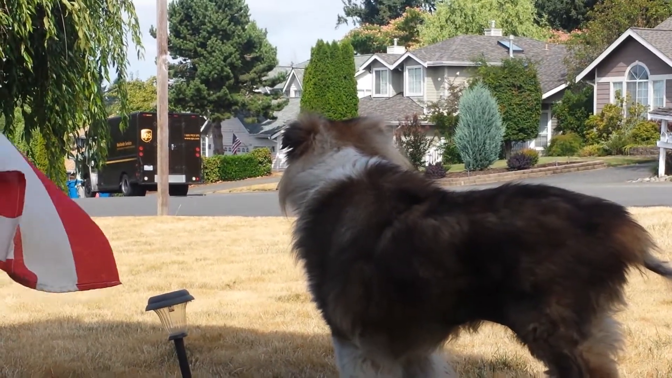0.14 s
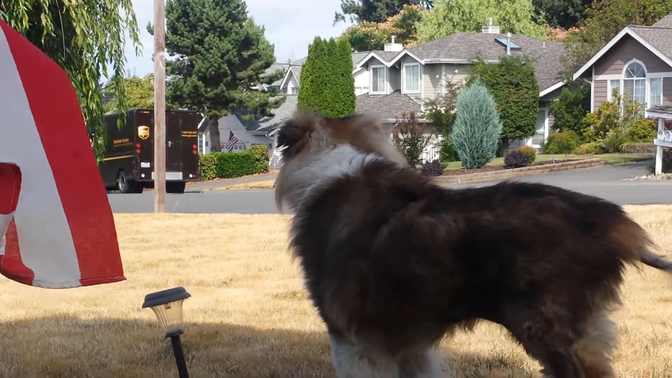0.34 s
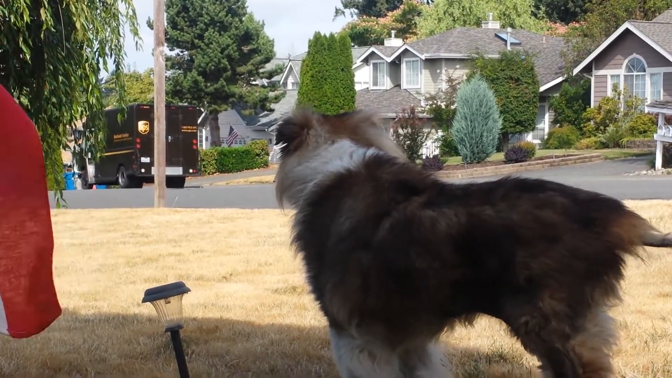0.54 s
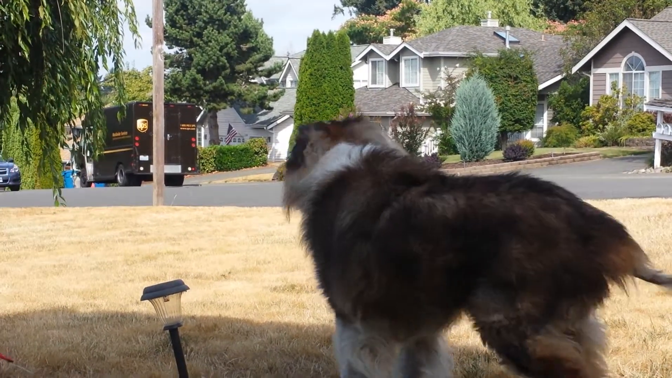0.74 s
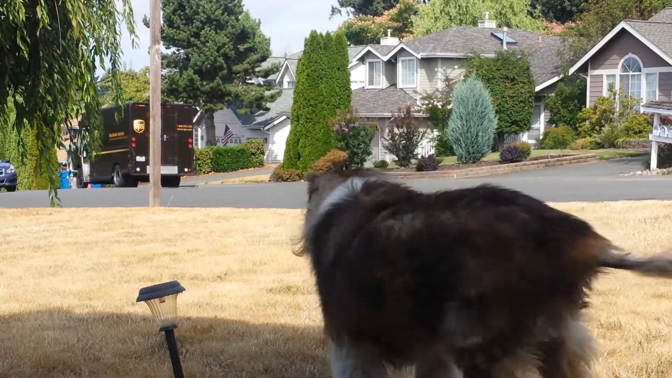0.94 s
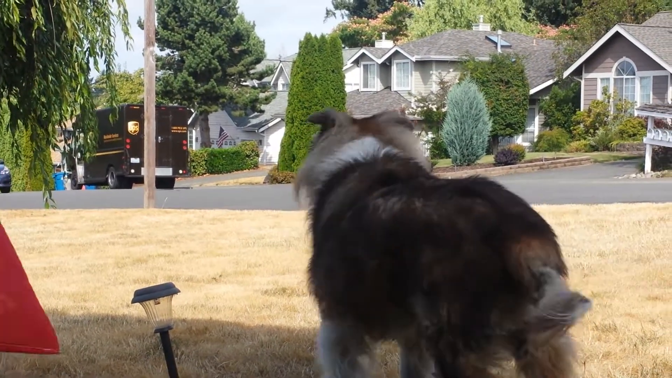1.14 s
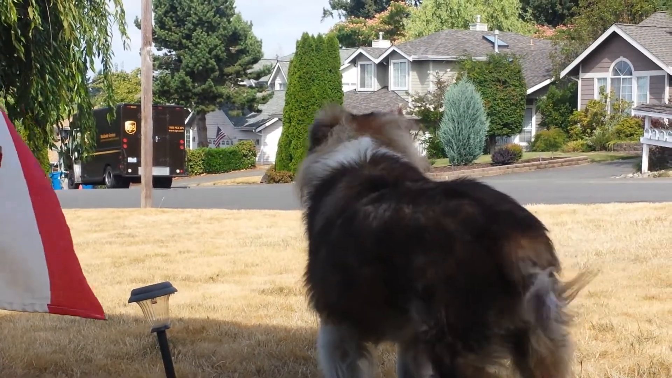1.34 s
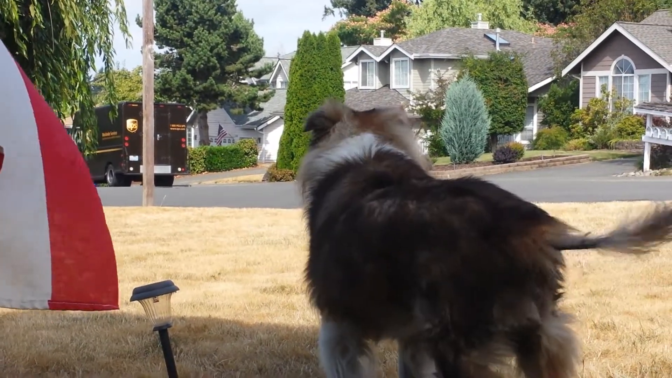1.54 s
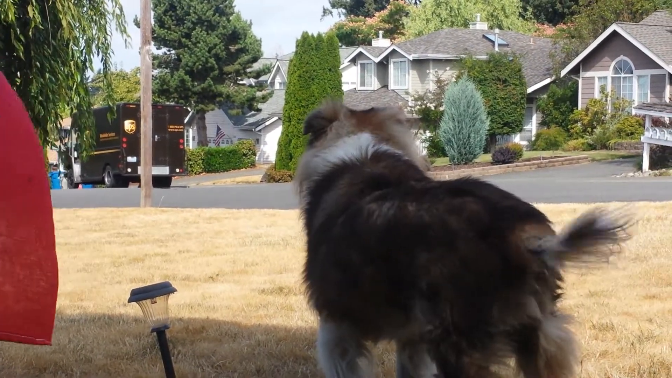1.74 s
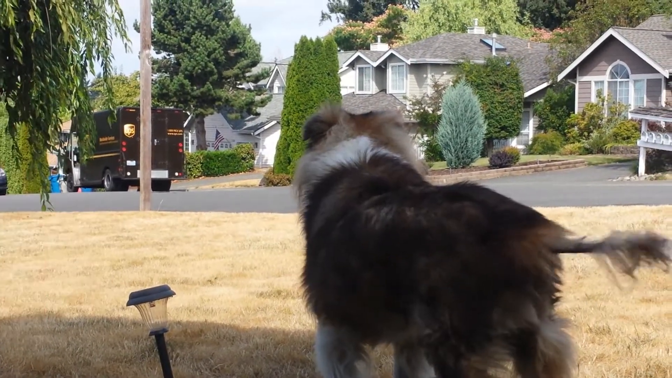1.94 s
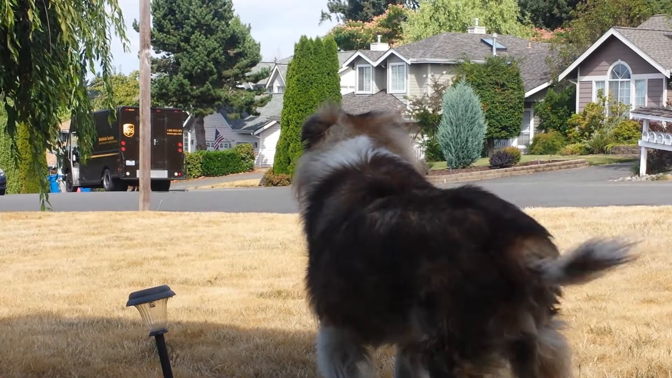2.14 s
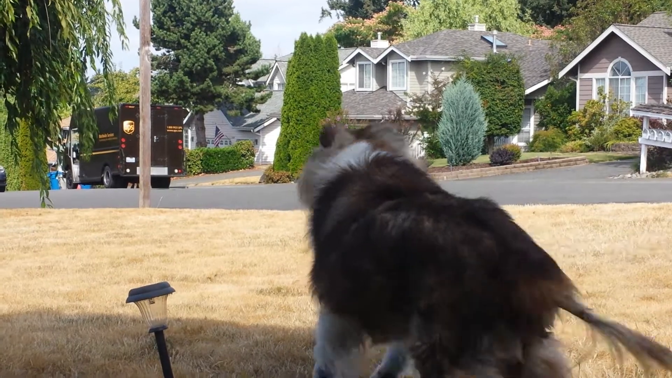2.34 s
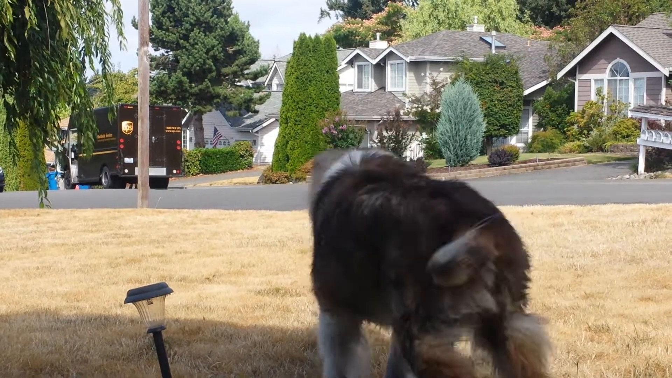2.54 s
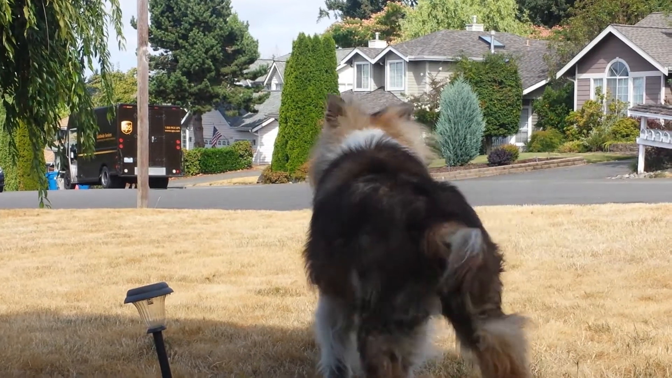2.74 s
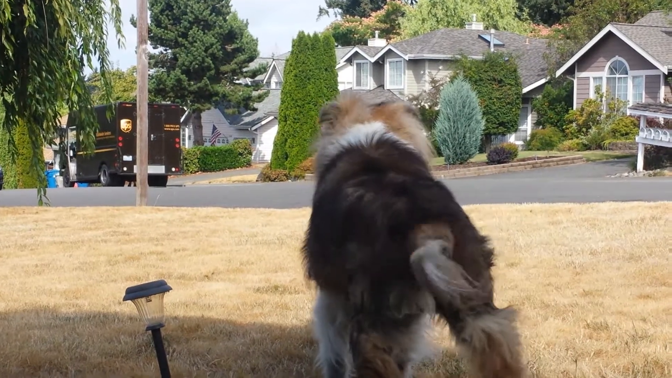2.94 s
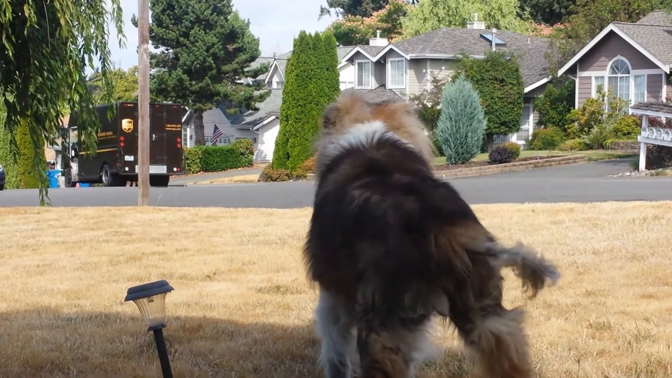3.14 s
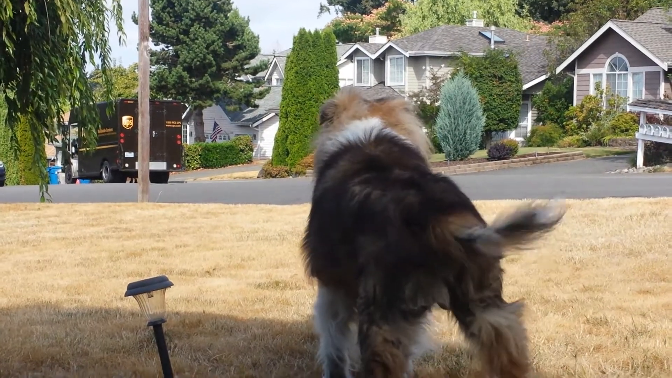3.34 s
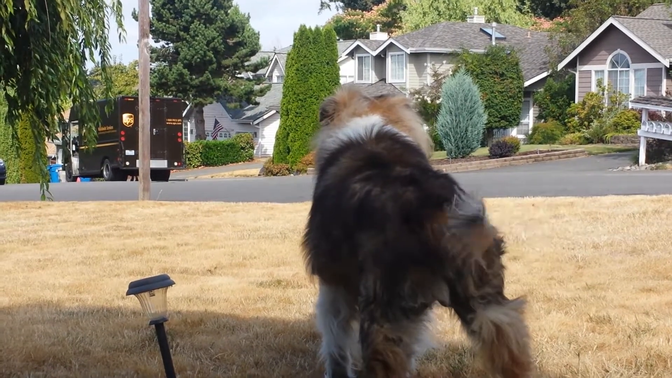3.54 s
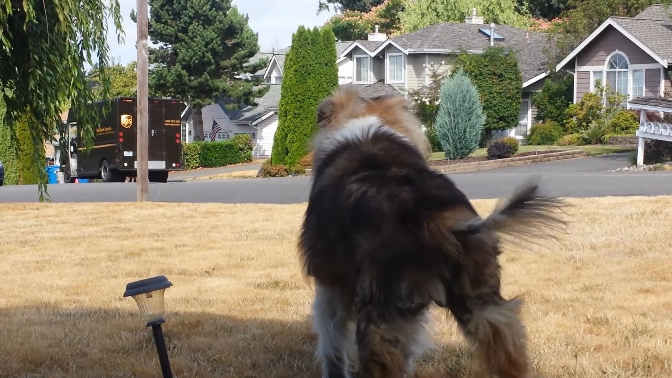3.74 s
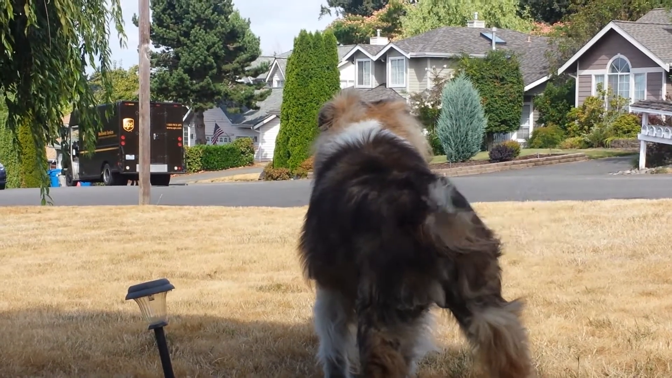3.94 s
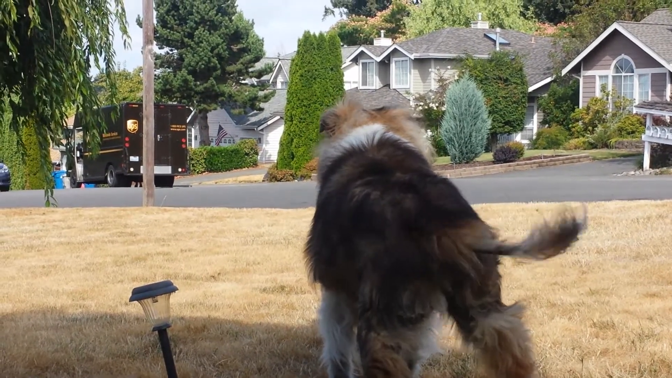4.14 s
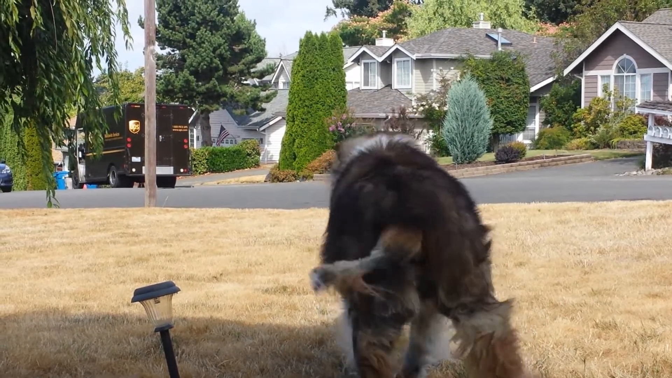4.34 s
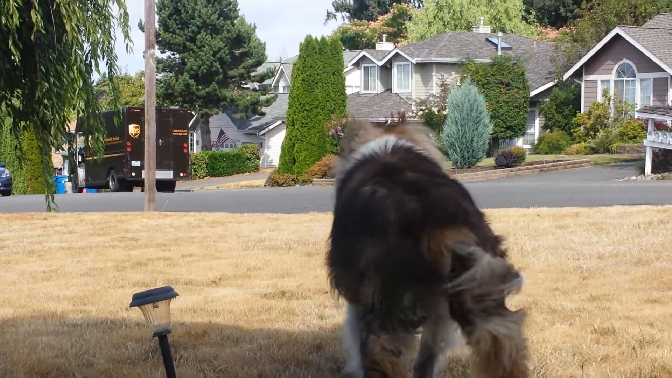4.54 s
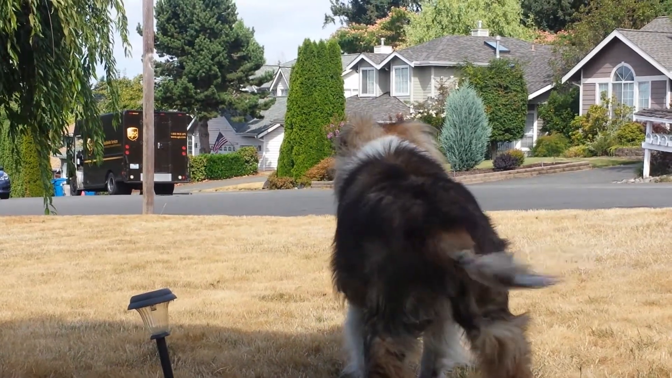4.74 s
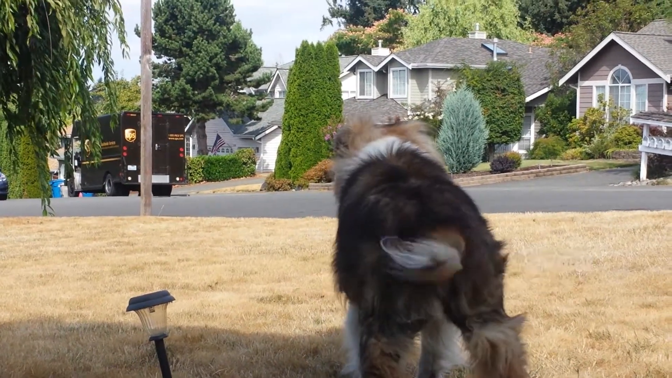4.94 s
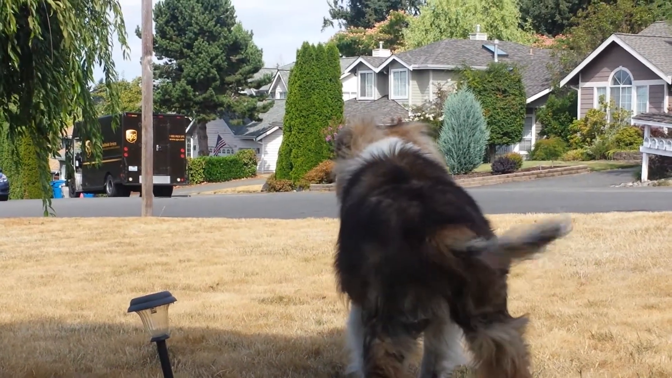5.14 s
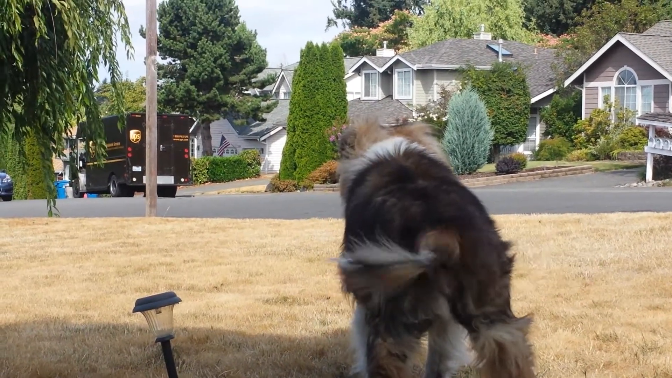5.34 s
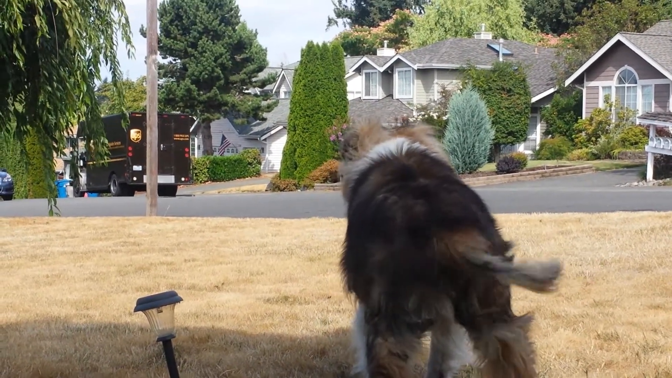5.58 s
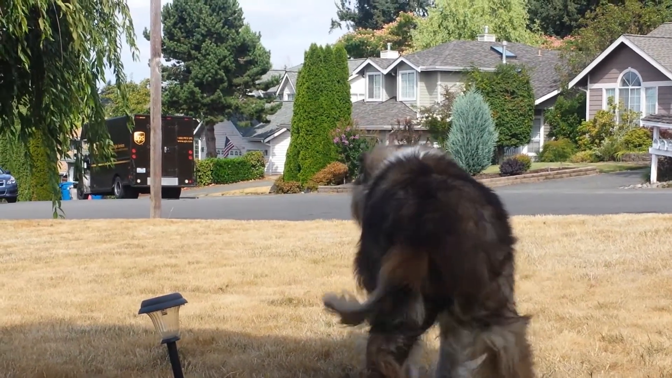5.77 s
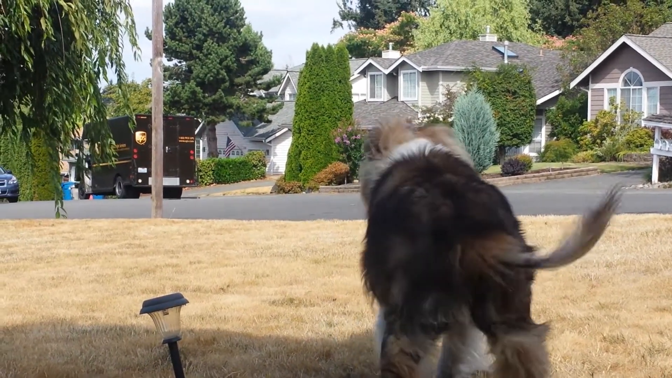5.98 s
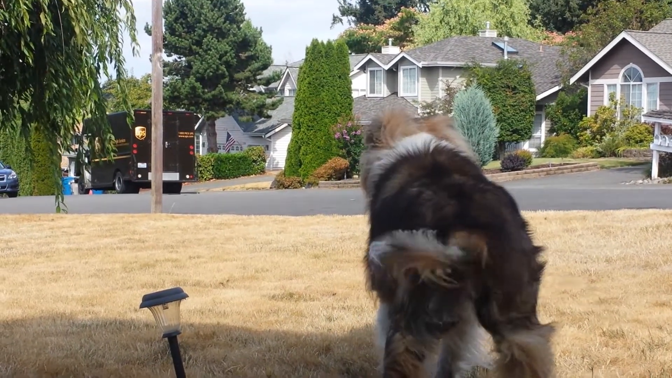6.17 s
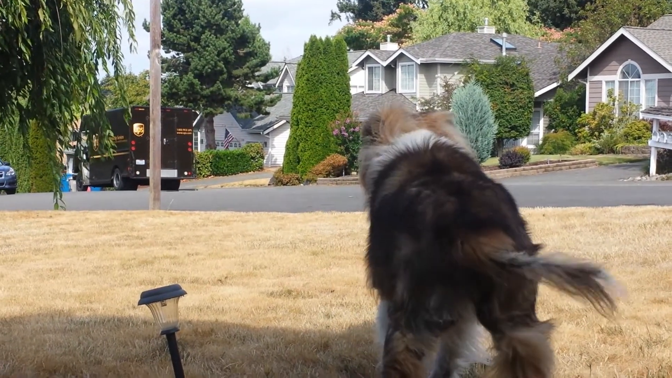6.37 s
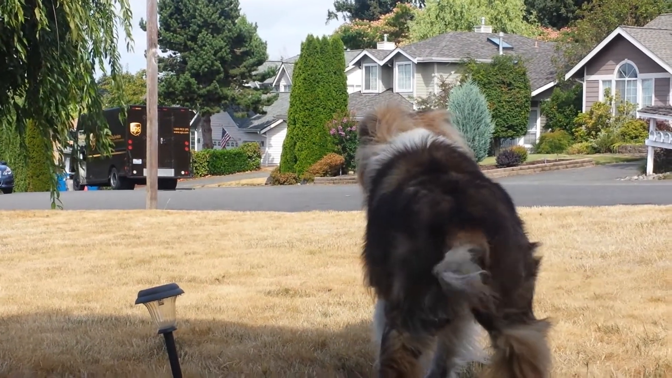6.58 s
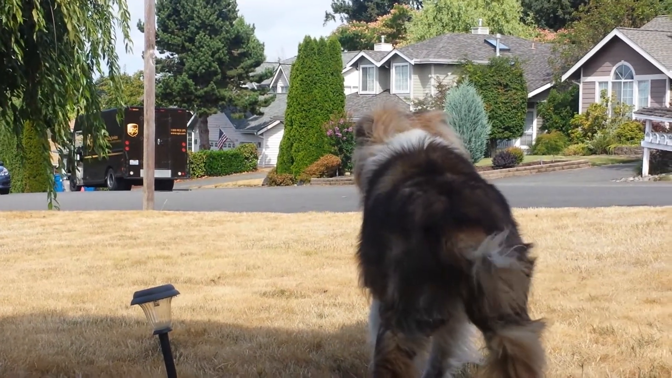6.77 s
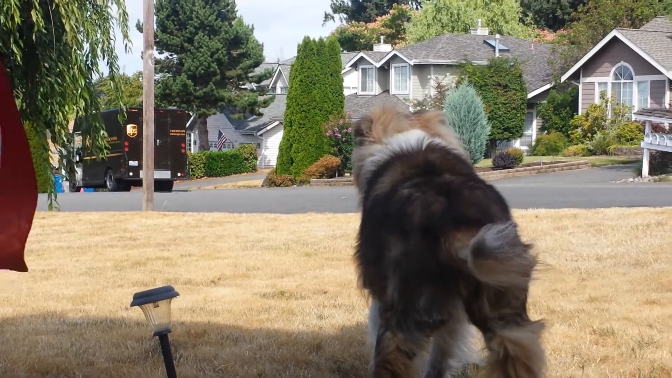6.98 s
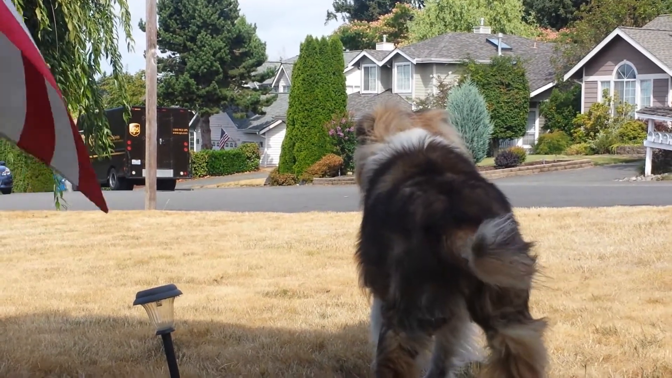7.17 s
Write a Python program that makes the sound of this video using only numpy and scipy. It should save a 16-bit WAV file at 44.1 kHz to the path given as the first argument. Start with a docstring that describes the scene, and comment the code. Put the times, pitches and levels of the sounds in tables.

```python
"""Dog barking on a lawn

A dog, facing away, barks four times and growls between the barks of each pair.
Each bark climbs from a rasp into a hooting arch of pitch, then falls back into the growl:
throat slaps that ring chest and mouth. The nose whines; house walls echo.
Behind it: fur and grass rustle, faint whistles, an idling van, the hush of the street."""
import sys
import numpy as np
from scipy import signal
from scipy.fft import rfft, irfft, next_fast_len
from scipy.io import wavfile
from scipy.ndimage import uniform_filter1d, minimum_filter1d, map_coordinates

SR = 44100
rng = np.random.default_rng(int(sys.argv[2]) if len(sys.argv) > 2 else 0)


def store_pcm(level_fs):
    """Save levels as 16-bit WAV."""
    pcm = np.round(np.clip(level_fs, -1, 1) * 32767).astype(np.int16)
    wavfile.write(sys.argv[1], SR, np.atleast_2d(pcm).T)


N = 318005

# dog's push, one list per phrase: (time [s], effort [dB])
EFFORT = [
    [(0.71, -51), (0.73, -28), (0.78, -13), (1.02, -9), (1.09, -6.5), (1.26, -14.5), (1.3, -25),
     (1.44, -35), (2.16, -30), (2.27, -23), (2.35, -9.5), (2.45, -6), (2.55, -12.5), (2.57, -19),
     (2.69, -19), (2.8, -31), (2.94, -35), (3.0, -60.5)],
    [(4.11, -45), (4.23, -16.5), (4.27, -10.5), (4.35, -3.5), (4.38, -16.5), (4.43, -8.5), (4.49, -16),
     (4.85, -33), (5.32, -29), (5.64, -19.5), (5.71, -6.5), (5.77, -6), (5.88, -11), (5.92, -17),
     (6.3, -35), (6.36, -51)],
]
# (start [s], length [s], opening rasp [s], purity after it [0-1], then trims: low ring [dB],
#  high rings [dB], harmonic 2 [dB], harmonic 3 [dB], harmonics 4-8 [dB], hiss [dB])
BARKS = [(0.743, 0.59, 0.15, 0.98, 2, 4.5, 1.5, -3.5, -6, 1.5),
         (2.299, .27, 0.061, 0.99, 5, 0, -6, 1, -7, 0),
         (4.219, 0.29, 0.19, 0.63, 1.5, -3, -1, 4.5, -1.5, 3.5),
         (5.66, 0.2667, 0.071, 0.86, -6, -3.5, -2, -5.5, -7, 1)]
# pitch swoops: (peak time [s], nominal top [Hz], rise [s], fall [s])
PITCH_ARCHES = [(.843, 532.4, 0.062, 0.11), (1.08, 532.3, .078, .112), (2.428, 521, .07, .08),
                (4.333, 533.2, .05, .11), (5.762, 524.5, 0.061, 0.11)]
# mouth resonances in the rasp: (centre at 500 Hz pitch [Hz], width [Hz], gain [dB])
MOUTH_RINGS = [(886, 250, -2), (1403, 230, -2.5), (2685, 600, -26.5)]
# mouth response on harmonics 2-3 and 4-8: (frequency [Hz], gain [dB])
VOWEL = [(700, -26), (850, -16.5), (980, -25), (1060, -20), (1200, -35), (1350, -24.5), (1450, -20),
         (1540, -23.5), (1620, -34)]
OVERTONES = [(1150, -29), (1450, 3), (1700, -19), (1900, -12), (2120, -15.5), (2400, -25.5), (2750, -27),
             (3000, -30), (3300, -34.5), (4000, -64.5)]
# throat slaps: (effort [dB], rate [Hz])
FLAP_RATE = [(-42, 68), (-35, 87), (-31, 89), (-25, 112), (-18, 143)]
# growl resonances: (centre [Hz], width [Hz], gain [dB])
CHEST_MODES = [(180, 94, 6), (292, 51, 7.5)]
THROAT_MODES = [(428.2, 40, 4), (526, 63.4, -2.5)]
# extra throat level, partly applied to the rasp: (time [s], gain [dB])
THROAT_LIFT = [(0.8, -3), (1.45, -9), (2.1, -7.5), (2.3, 0), (2.7, -0.5), (4.5, 0.5), (5.2, -2), (6.2, 1)]
# open mouth and hiss at the teeth: (frequency [Hz], gain [dB])
MOUTH_SPECTRUM = [(250, -38.5), (420, -4.5), (520, -6.5), (620, -3), (720, 4.5), (880, -2.5), (1100, 0),
                  (1220, -5.5), (1430, -3.5), (1680, -15.5), (2300, -16.5), (2750, -39.5), (3300, -31.5),
                  (4000, -64), (9000, -71.5)]
TEETH_SPECTRUM = [(1500, -34.5), (2800, -12), (3400, -9), (4100, -47.5), (4900, -12), (5450, -3.5),
                  (6500, -13), (7700, -11), (9000, -37.5), (15000, -27.5)]
# nasal whines: (start [s], length [s], centre [Hz], level [dB])
WHINES = [(2.236, 0.17, 2865, -46), (4.221, 0.1, 2985, -41), (4.717, 0.13, 1153, -49.5),
          (5.484, 0.27, 2860, -54), (5.962, 0.28, 2730, -56)]
# house walls: (delay [s], gain [dB], low-pass [Hz])
WALL_ECHOES = [(.068, -12.5, 1500), (.11, -41, 1174)]
# yard decay: (frequency [Hz], T60 [s])
YARD_T60 = [(150, 0.35), (1000, .55), (6000, 0.65), (14000, 0.13)]
# fur and grass: (centre time [s], length [s], level [dB])
RUSTLES = [(0.95, 0.13, -62), (1.2, .14, -61), (2.455, .035, -51.5), (2.638, 0.17, -51),
           (2.81, 0.077, -56.5)]
# grass underfoot: (time [s], relative level [dB])
TICKS = [(6.3435, -39.5), (6.9289, -44.5), (7.1018, -38)]
# faint tones: (start [s], length [s], pitch [Hz], level [dB])
WHISTLES = [(1.556, 0.078, 8100, -54.5), (6.51, 0.666, 968, -54.5)]
# engine hum: (frequency [Hz], level [dB], share of swell [0-1])
IDLE_LINES = [(78.4, -64.5, 1), (134, -54.5, 0.3)]
# hum swell: (time [s], gain [dB])
IDLE_SWELL = [(0, 0), (1.4, -3), (2.2, 14), (4.0, 10.5), (6.0, 0)]
# street noise: (frequency [Hz], relative density [dB])
STREET_SPECTRUM = [(15, -53), (25, -32.5), (75, -7.5), (240, -6.5), (378, -13.5), (552, -4), (648, -8.5),
                   (997, -14), (3630, -36), (7910, -33), (9000, -42), (15500, -43.5)]
# street surges: (peak time [s], half width [s], rumble [dB], hush [dB], air [dB])
STREET_SWELLS = [(0.03, .13, 6, 1.5, 8.5), (0.12, 0.66, 8, 13.5, 4), (3.7, 0.53, 3.5, 6, 0.5),
                 (7.25, 0.33, 6.5, 1, 3.5)]
# street stereo likeness: (frequency [Hz], L/R correlation [negative acts as 0])
STREET_COHERENCE = [(60, 0.94), (130, 0.94), (290, 0.92), (640, 0.75), (1410, -0.84), (3100, -0.27),
                    (6820, 0.61), (15000, 0.93)]
# stereo balance: (frequency [Hz], left minus right [dB])
DOG_PAN = [(100, 2), (400, 3.5), (550, 3), (900, 6), (1400, 5), (2400, 9.5), (4400, 9.5), (6000, 6),
           (8000, -9), (15000, -12.5)]
BACKGROUND_PAN = [(100, 2.5), (700, 3.5), (1500, 5), (4400, 3), (6000, 6), (8000, -12), (15000, 10)]

# growl parts: (base level at full growl [dB], slope on effort [dB/dB], drop under hoot [dB])
CHEST_LAW, THROAT_LAW = (-23, 0.63, 40.5), (-18.5, 1.096, 23)
RASP_LAW, HISS_LAW = (-28, 1.245, 26), (-57.5, 0.79, 0)


def dog(jaw_rasp_db=5, jaw_hiss_db=6.5):
    """Barks and growls from one throat, driven by one effort curve."""
    effort_db, = curves([row for phrase in EFFORT for row in phrase])
    voiced = sum(during(phrase[0][0], phrase[-1][0]) for phrase in EFFORT)
    hooting, purity, jaw = gestures()
    trims = [(s, *levels) for start, length, _, _, *levels in BARKS for s in (start, start + length)]
    *colour_db, hiss_trim_db = curves(trims)
    flap_hz = np.interp(effort_db, *np.transpose(FLAP_RATE))
    lift_db, = curves(THROAT_LIFT)
    chest_db = part_db(CHEST_LAW, effort_db, hooting * jaw * support(effort_db))
    throat_db = part_db(THROAT_LAW, effort_db, purity) + lift_db
    rasp_db = part_db(RASP_LAW, effort_db, purity) + jaw_rasp_db * jaw + 0.27 * lift_db
    hiss_db = part_db(HISS_LAW, effort_db, purity) + (jaw_hiss_db + hiss_trim_db) * jaw + 3 * wobble(24)
    barks = hooting * bark(effort_db, purity, jaw, flap_hz, colour_db, hiss_db)
    return barks + voiced * growl(flaps(flap_hz), chest_db, throat_db, rasp_db, hiss_db, jaw)


def gestures(attack_s=0.025, release_s=0.026, clear_s=0.071, jaw_open_s=0.097, jaw_close_s=0.28):
    """Hoot share, hoot purity and jaw opening per sample, each 0-1."""
    hooting = purity = jaw = 0
    for start, length, rasp_s, top_purity, *_ in BARKS:
        end = start + length
        held = ramp(start, attack_s) * (1 - ramp(end - release_s, release_s))
        hooting += held
        purity += top_purity * held * ramp(start + rasp_s - clear_s / 2, clear_s)
        jaw += ramp(start, jaw_open_s) * (1 - ramp(end, jaw_close_s))
    return hooting, purity, jaw


def support(effort_db, fray_db=-27.5, range_db=11):
    """1 while effort carries a full bark, 0 once it sinks to fray_db."""
    return np.clip((effort_db - fray_db) / range_db, 0, 1)


def bark(effort_db, purity, jaw, flap_hz, colour_db, hiss_db, flicker_db=3):
    """Near-pure hoot; rough folds break its harmonics up into the mouth's own ring."""
    low_ring_db, high_ring_db, second_db, third_db, upper_db = colour_db
    pitch_hz = bark_pitch_hz(effort_db)
    rough = 0.48 * (1 - purity)
    flutter = np.sin(phase_of(flap_hz * (1 + .08 * wobble(70))))
    phase = phase_of(pitch_hz) + rough * (0.6 * wobble(170) + 0.14 * flutter)
    tone = amp(-6 * rough) * (np.sin(phase) + 0.28 * rough * wobble(230) * np.cos(phase))
    ring_shift = (pitch_hz / 500) ** 0.38
    rings = sum(amp(db + trim) * narrow_noise(hz * ring_shift, width)
                for (hz, width, db), trim in zip(MOUTH_RINGS, [low_ring_db, high_ring_db, high_ring_db]))
    drift_a, drift_b = wobble(25), wobble(25)

    def harmonics(shape, orders):
        """Harmonics slide through fixed resonances, each flickering."""
        flicker = lambda k: flicker_db * (drift_a * np.cos(2 * k) + drift_b * np.sin(2 * k))
        return sum(amp(along(shape, k * pitch_hz) + flicker(k)) * np.sin(k * phase) for k in orders)

    vowel = amp(second_db) * harmonics(VOWEL, [2]) + amp(third_db) * harmonics(VOWEL, [3])
    upper = amp(upper_db - 15) * (1 - rough) ** 2 * harmonics(OVERTONES, range(4, 9))
    buzz = amp(hiss_db - 6) * harmonics(TEETH_SPECTRUM, range(10, 18))
    voice = tone + (1 - rough ** 2) * vowel + support(effort_db) * (rough * np.sqrt(jaw) * rings + upper)
    return np.sqrt(2) * (amp(effort_db) * voice + buzz)


def bark_pitch_hz(effort_db, base_hz=400, sag_from_db=-21, sag_hz_per_db=10):
    """Bell-shaped arches over a base that sags as effort fades."""
    t = times()
    arches = sum((top_hz - base_hz) * bell(s, np.where(t < s, rise, fall))
                 for s, top_hz, rise, fall in PITCH_ARCHES)
    sag = uniform_filter1d(sag_hz_per_db * np.minimum(effort_db - sag_from_db, 0), size=3500)
    return (base_hz + arches + sag) * (1 + .005 * wobble(45))


def growl(pulses, chest_db, throat_db, rasp_db, hiss_db, jaw, puff_s=0.0062, lips_hz=850, leak_hz=240):
    """Slaps ring chest and throat; each frees a puff that rasps in the mouth and hisses at the teeth."""
    puffs = np.sqrt(np.abs(signal.lfilter([1], [1, -np.exp(-1 / (puff_s * SR))], pulses)))
    air = lambda *shape: unit(puffs * rng.standard_normal((*shape, N)))
    slaps = unit(pulses - pulses.mean())
    deep = resonant(slaps + .27 * air(), CHEST_MODES, cutoff_hz=363)
    # open jaws leak the deepest ring
    lean = unit(filtered(deep, lambda hz: hz ** 4 / np.hypot(hz ** 4, leak_hz ** 4)))
    chest = amp(chest_db) * (jaw * lean + (1 - jaw) * deep)
    throat = amp(throat_db) * resonant(slaps + 0.84 * air(), THROAT_MODES, cutoff_hz=625)
    bright = coloured(slaps + air(), MOUTH_SPECTRUM)
    muffled = filtered(bright, lambda hz: 1 / np.hypot(1, (hz / lips_hz) ** 4))
    gape = 0.14 + 0.48 * jaw ** 2
    mouth = amp(rasp_db) * (gape * bright + (1 - gape) * muffled)
    teeth = amp(hiss_db) * coloured(air(2), TEETH_SPECTRUM) * np.sqrt(2)
    return chest + throat + mouth + teeth


def flaps(rate_hz, spread_db=1.6):
    """One pulse per throat slap; faster flapping is less even."""
    cycles = np.cumsum(rate_hz * (1 + .04 * wobble(45))) / SR
    onsets = np.flatnonzero(np.diff(np.floor(cycles)))
    late, size = rng.standard_normal((len(onsets), 2)).T
    delay_s = .00032 * (rate_hz[onsets] / 100) ** 2 * late
    return np.bincount(np.clip(onsets + delay_s * SR, 0, N - 1).astype(int), amp(spread_db * size), N)


def part_db(law, effort_db, hoot, full_growl_db=-15.5):
    """A growl part grows with effort up to full growl and yields to the hoot."""
    top_db, slope, drop_db = law
    return top_db + slope * np.minimum(effort_db - full_growl_db, 0) - drop_db * hoot


def whines(width_hz=300, waver_db=4.3):
    """Air squeezed through the nose: thin, breathy whistles."""
    out = 0
    for start, length, hz, db in WHINES:
        swell = np.sqrt(np.abs(np.sin(np.pi * ramp(start, length)))) * during(start, start + length)
        gain = amp(db + waver_db * wobble(22))
        out += gain * swell * narrow_noise(hz * (1 + .015 * wobble(13)), width_hz)
    return out


def yard(x, tail_db=-21, stereo_lag_s=0.00029):
    """Side-wall echoes beat against the gliding pitch; trees and houses add a thin tail."""
    lag_s = np.array([[-.5], [.5]]) * stereo_lag_s
    walls = filtered(x, lambda hz: sum(
        amp(db) * np.exp(-2j * np.pi * hz * (delay_s + lag_s)) / np.hypot(1, hz / cutoff_hz)
        for delay_s, db, cutoff_hz in WALL_ECHOES))
    hz, t, noise = signal.stft(rng.standard_normal((2, SR * 3 // 4)), SR, nperseg=256)
    _, impulse = signal.istft(noise * amp(-60 * t / along(YARD_T60, hz)[:, None]), SR, nperseg=256)
    tail = signal.fftconvolve(x, impulse / np.linalg.norm(impulse[0]), axes=1)[:, :N]
    return x + walls + amp(tail_db) * tail


def rustles(grain_db=3):
    """Fur and dry grass brush as the dog bounces."""
    strokes = sum(amp(db) * during(s - length / 2, s + length / 2, .03) for s, length, db in RUSTLES)
    grains = amp(grain_db * wobble(300)) * rng.standard_normal((2, N))
    return strokes * coloured(grains, [(2000, -23), (7000, 0), (10000, -5.5), (15000, -8.5)])


def grass_ticks(trim_db=-7, t60_s=0.047):
    """Dry grass snaps underfoot."""
    t = times()
    snaps = sum(amp(db + trim_db - 60 * np.abs(t - s) / t60_s) * (t >= s) for s, db in TICKS)
    noise = rng.standard_normal((2, N))
    return snaps * coloured(noise, [(400, -29), (1400, 4.5), (5000, -5), (12000, -21)])


def whistles():
    """Faint, thin, wavering tones."""
    return sum(amp(db) * during(s, s + length, 0.017) * np.sin(2 * np.pi * hz * times() + wobble(30))
               for s, length, hz, db in WHISTLES)


def van_idle(waver_db=3):
    """Two low engine lines swell and waver."""
    swell_db, = curves(IDLE_SWELL)
    out = 0
    for hz, db, share in IDLE_LINES:
        gain = amp(db + share * swell_db + waver_db * wobble(4.9))
        out += gain * np.sqrt(2) * np.sin(phase_of(hz * (1 + .015 * wobble(9))))
    return out


def street(edges_hz=(0, 320, 2800, SR / 2), rest_db=(-50, -52.5, -62.5)):
    """Far traffic and leaves surge in three bands: rumble, hush, air."""
    side_gain = lambda hz: np.tan(np.arccos(np.clip(along(STREET_COHERENCE, hz), 0, 1)) / 2)
    shape = lambda hz: amp(along(STREET_SPECTRUM, hz)) * np.array([np.ones_like(hz), side_gain(hz)])
    mid, side = filtered(rng.standard_normal((2, N)), shape)
    out = 0
    for k, (db, lo, hi) in enumerate(zip(rest_db, edges_hz, edges_hz[1:])):
        swell_db = sum(lifts[k] * bell(peak, width) for peak, width, *lifts in STREET_SWELLS)
        band = filtered(np.array([mid + side, mid - side]), lambda hz: (hz >= lo) & (hz < hi))
        out += amp(db + swell_db + 0.76 * wobble(7.1)) * band / band.mean(0).std()
    return out


def amp(db):
    return 10 ** (np.asarray(db) / 20)


def unit(x):
    return x / np.sqrt(np.mean(x ** 2) + 1e-20)


def times():
    return np.arange(N) / SR


def phase_of(hz):
    return 2 * np.pi * np.cumsum(hz) / SR


def ramp(start_s, length_s):
    return np.clip((times() - start_s) / length_s, 0, 1)


def bell(peak_s, width_s):
    return np.exp(-((times() - peak_s) / width_s) ** 2)


def during(start_s, end_s, fade_s=0.018):
    """Soft-edged gate."""
    t = times()
    return np.clip(np.minimum(t - start_s, end_s - t) / fade_s + .5, 0, 1)


def along(points, hz):
    """Interpolate (frequency [Hz], value) on a log axis."""
    knots_hz, values = np.transpose(points)
    return np.interp(np.log(hz + 1), np.log(knots_hz + 1), values)


def curves(rows):
    """One per-sample curve for each column after the time."""
    knots_s, *columns = np.transpose(rows)
    return [np.interp(times(), knots_s, column) for column in columns]


def wobble(rate_hz):
    """Smooth random curve, rate_hz knots a second."""
    knots = rng.standard_normal(int(N * rate_hz / SR) + 4)
    return map_coordinates(knots, [times() * rate_hz])


def narrow_noise(hz, width_hz):
    """Moving resonance stirred by chaotic air."""
    phase = phase_of(hz)
    return (wobble(width_hz) * np.sin(phase) + wobble(width_hz) * np.cos(phase)) / np.sqrt(2)


def filtered(x, response):
    """Apply a complex frequency response."""
    size = next_fast_len(N + SR // 2)
    return irfft(rfft(x, size) * response(np.fft.rfftfreq(size, 1 / SR)), size)[..., :N]


def coloured(x, spectrum):
    """Shape by (frequency [Hz], gain [dB]); rms 1."""
    return unit(filtered(x, lambda hz: amp(along(spectrum, hz))))


def resonant(x, modes, cutoff_hz):
    """Causal resonances of alternating sign, then a soft-tissue low-pass; rms 1."""
    rung = filtered(x, lambda hz: sum(
        (-1) ** k * amp(db) * 1j * hz * width / (centre ** 2 - hz ** 2 + 1j * hz * width)
        for k, (centre, width, db) in enumerate(modes)))
    return unit(signal.sosfilt(signal.butter(2, cutoff_hz, fs=SR, output="sos"), rung))


def panned(x, balance):
    """Split left/right by frequency, keeping the mid level."""
    return filtered(x, lambda hz: 2 / (1 + amp(np.outer([-1, 1], along(balance, hz)))))


def scene():
    """Dog in the echoing yard over the background; stereo."""
    foreground = yard(dog() + whines())
    background = street() + van_idle() + whistles() + grass_ticks() + rustles()
    return panned(foreground, DOG_PAN) + panned(background, BACKGROUND_PAN)


def record(dry, low_cut_hz=32, ceiling=0.9, top_hz=15550):
    """Bass cut, smooth peak limiter, band limit."""
    x = filtered(dry, lambda hz: hz ** 2 / np.hypot(hz ** 2, low_cut_hz ** 2))
    hold = SR // 100
    needed = np.minimum(1, ceiling / (np.abs(x).max(0) + 1e-9))
    held = minimum_filter1d(needed, 2 * hold)
    gain = uniform_filter1d(uniform_filter1d(held, hold), hold)
    return filtered(x * gain, lambda hz: hz < top_hz)


dry = scene()
out = record(dry)
store_pcm(out)
```